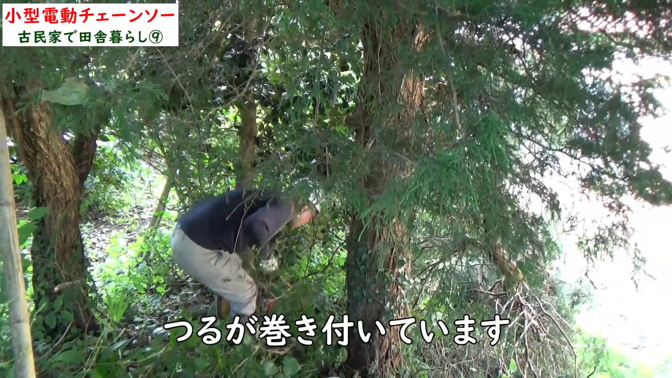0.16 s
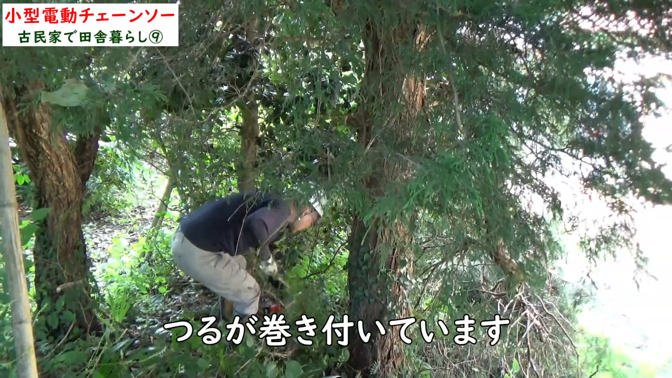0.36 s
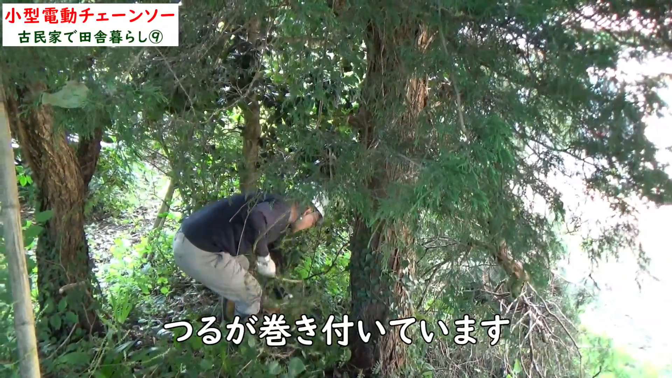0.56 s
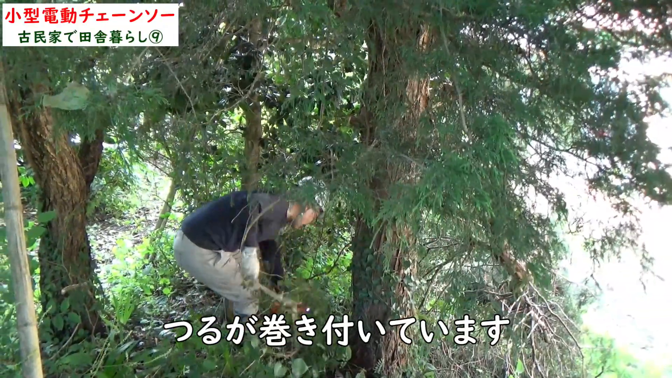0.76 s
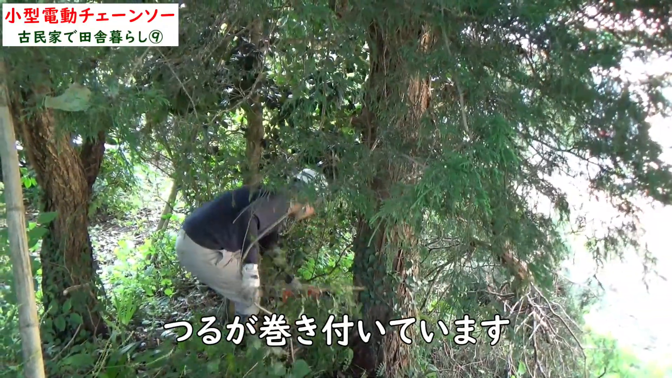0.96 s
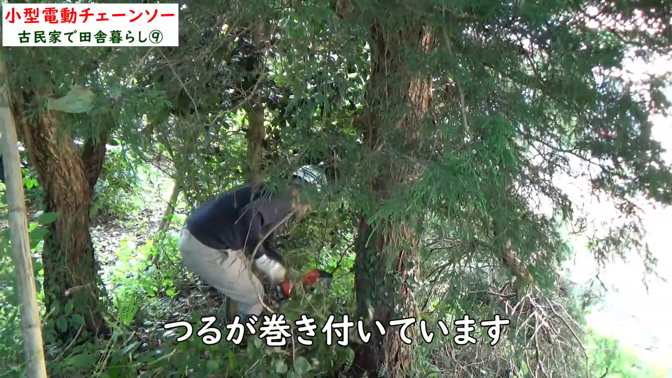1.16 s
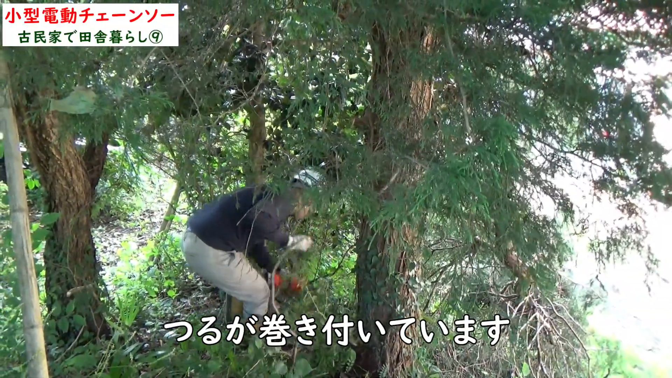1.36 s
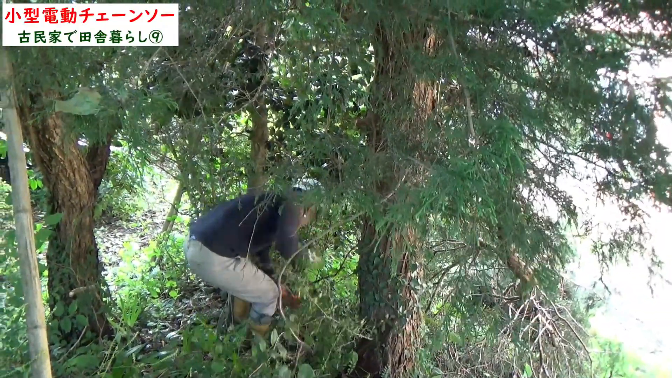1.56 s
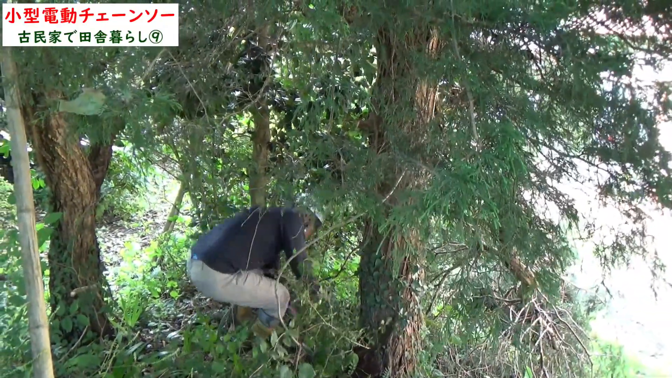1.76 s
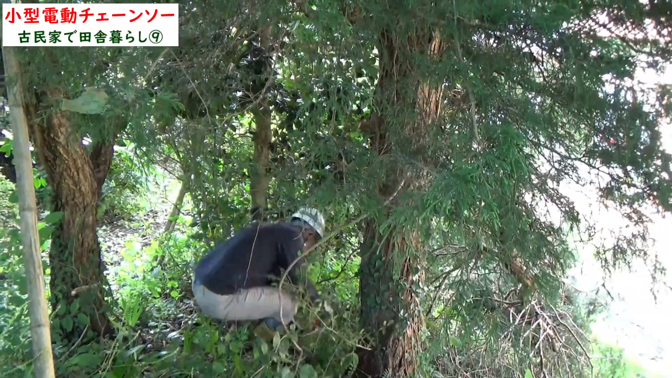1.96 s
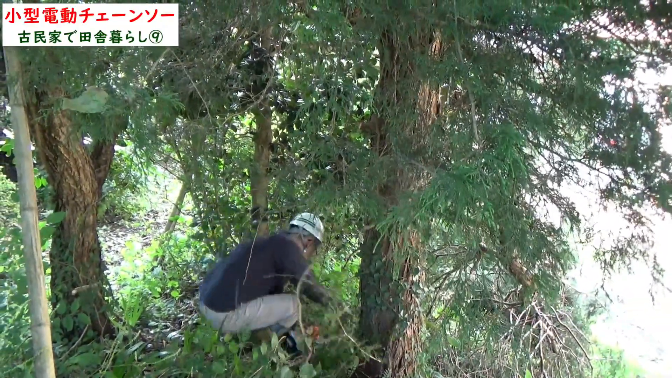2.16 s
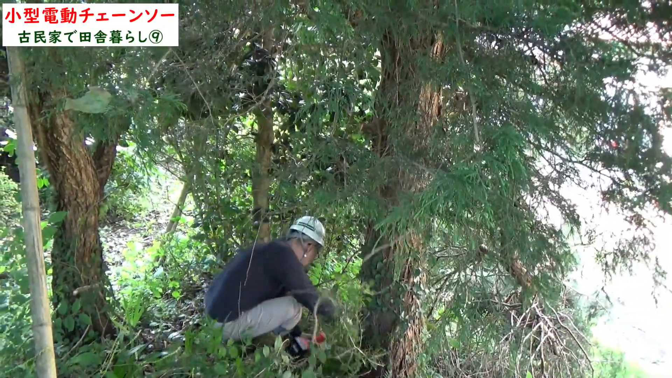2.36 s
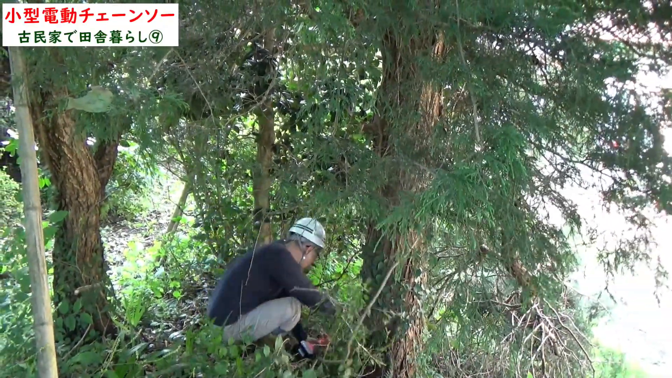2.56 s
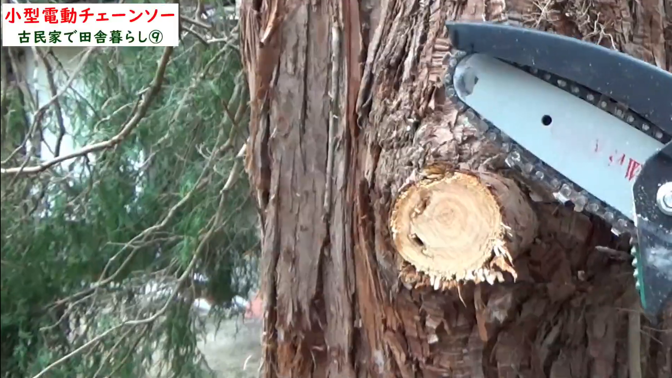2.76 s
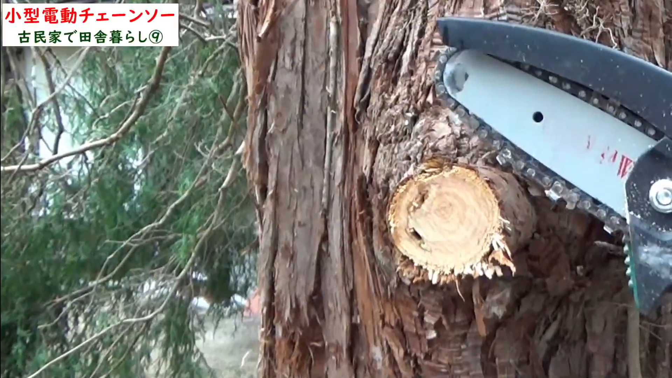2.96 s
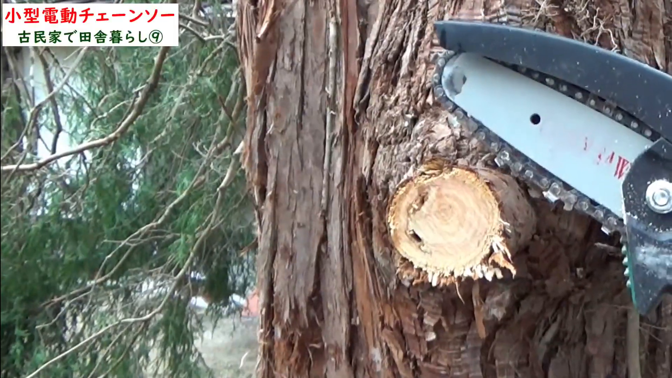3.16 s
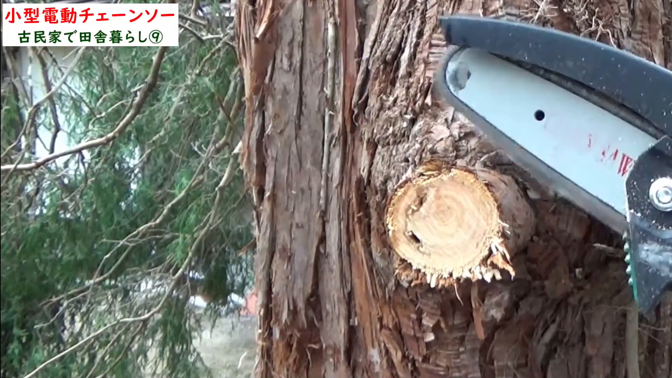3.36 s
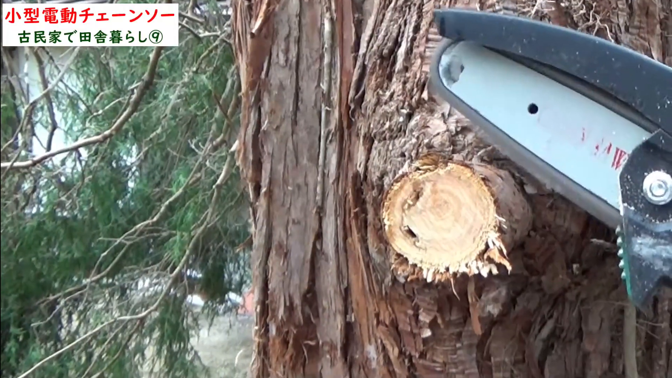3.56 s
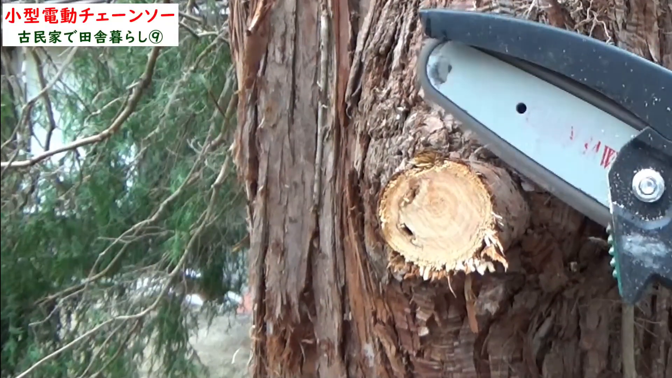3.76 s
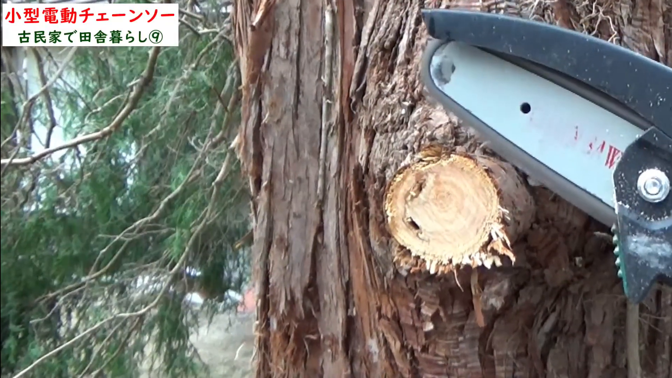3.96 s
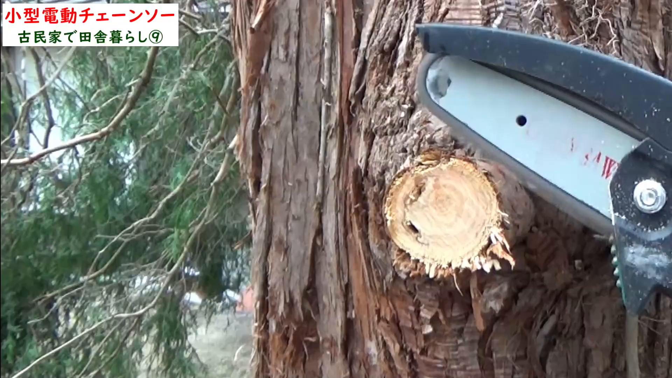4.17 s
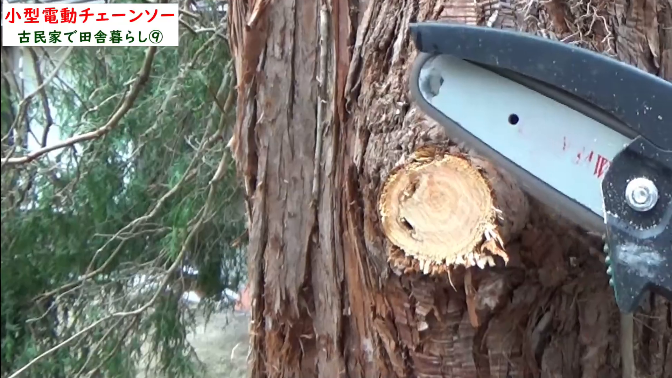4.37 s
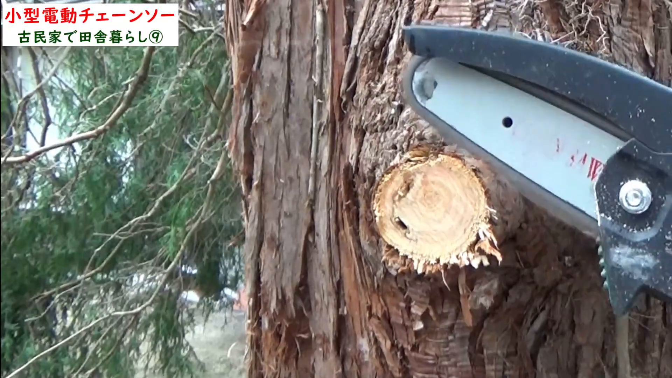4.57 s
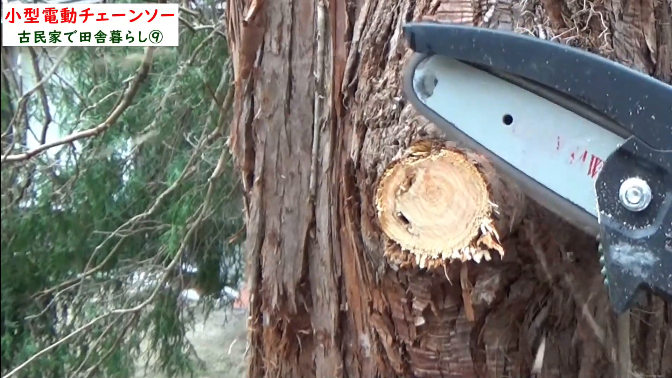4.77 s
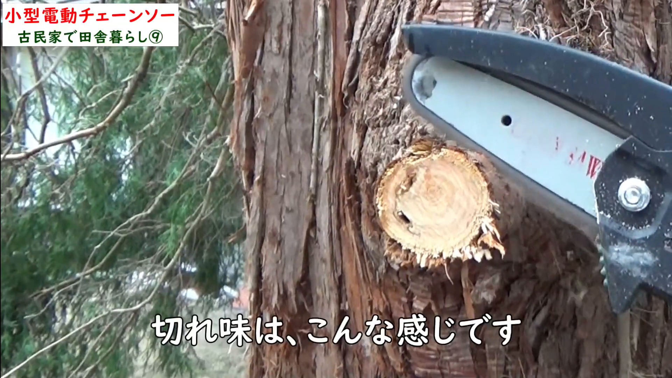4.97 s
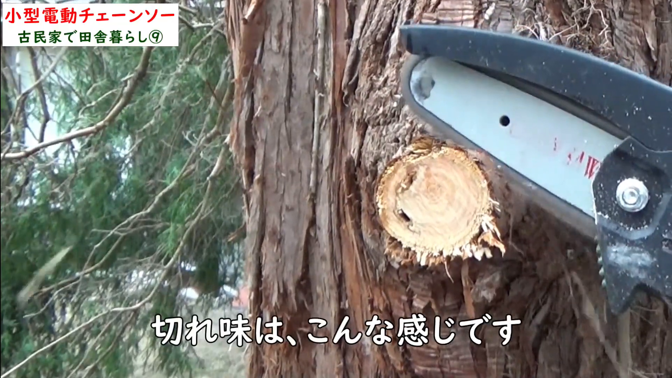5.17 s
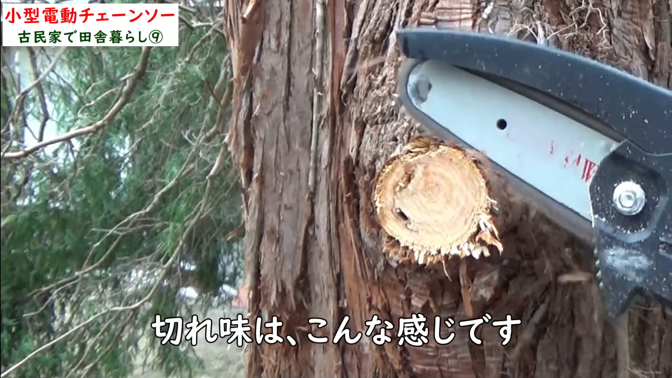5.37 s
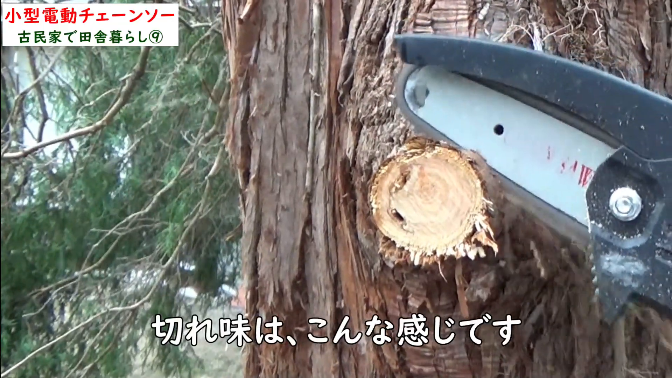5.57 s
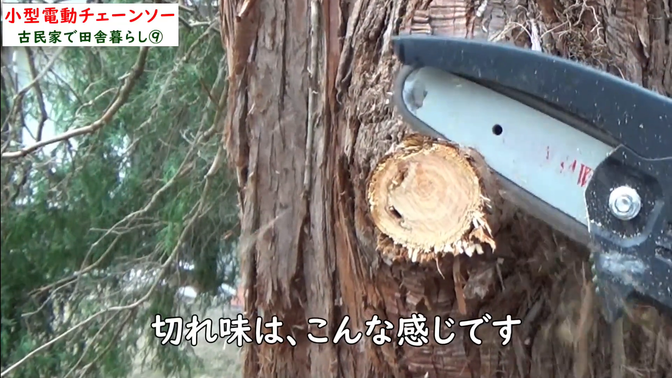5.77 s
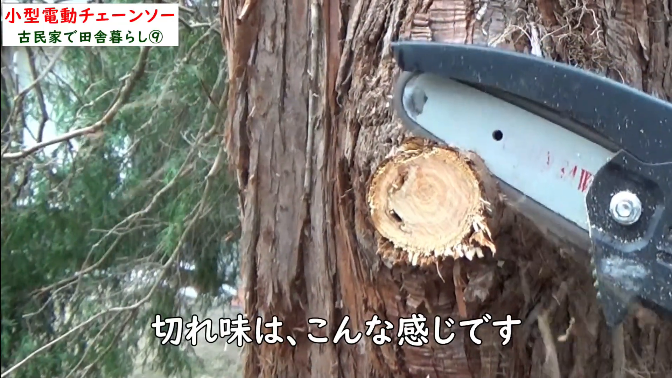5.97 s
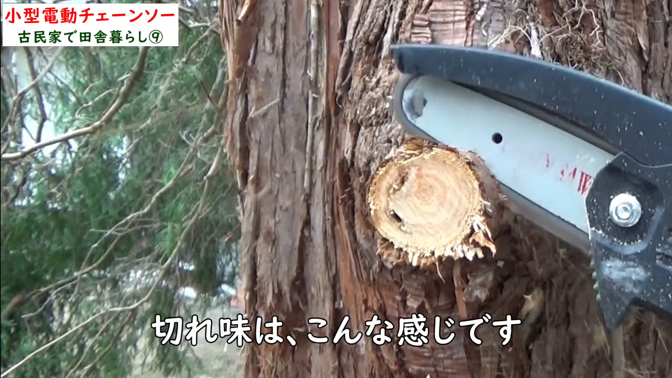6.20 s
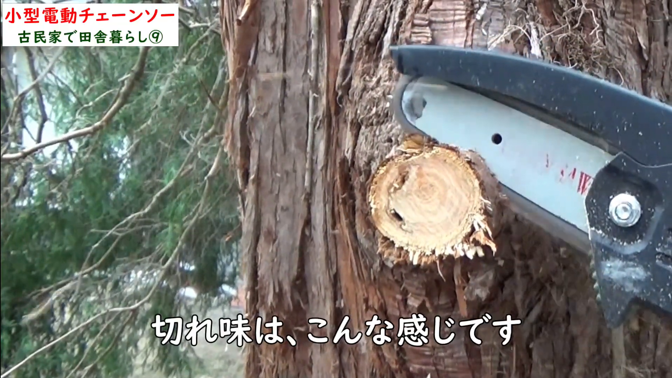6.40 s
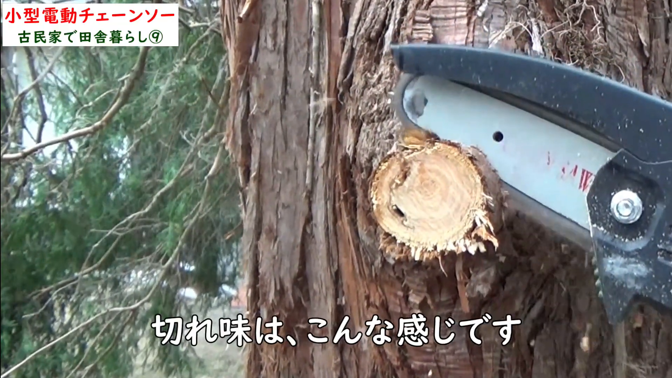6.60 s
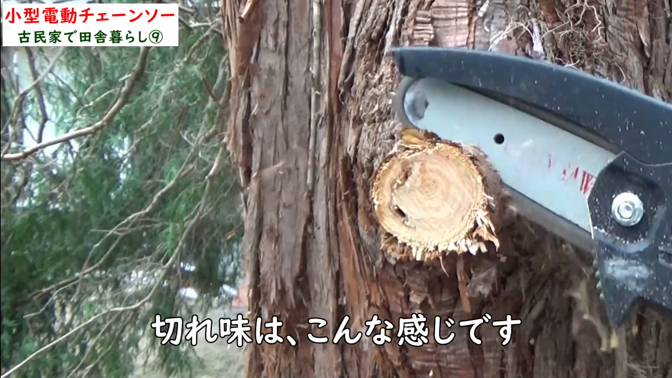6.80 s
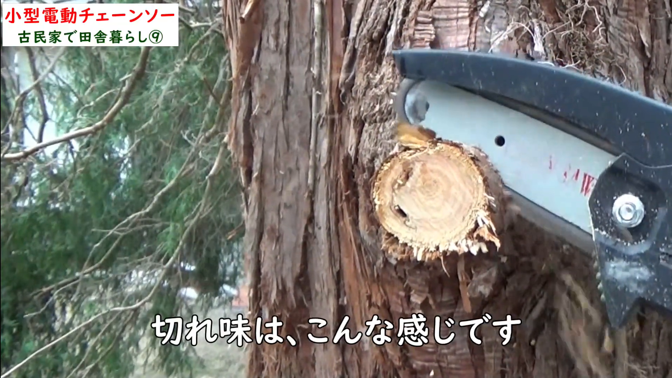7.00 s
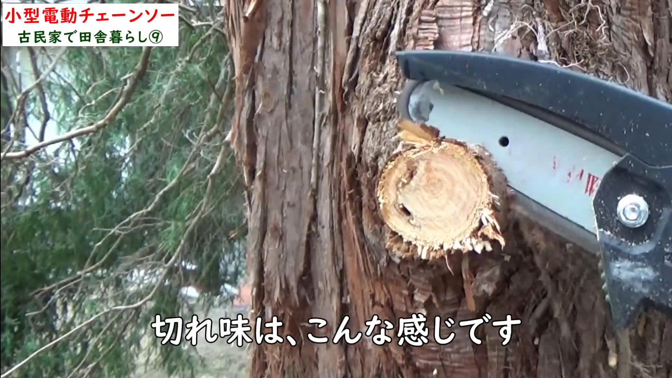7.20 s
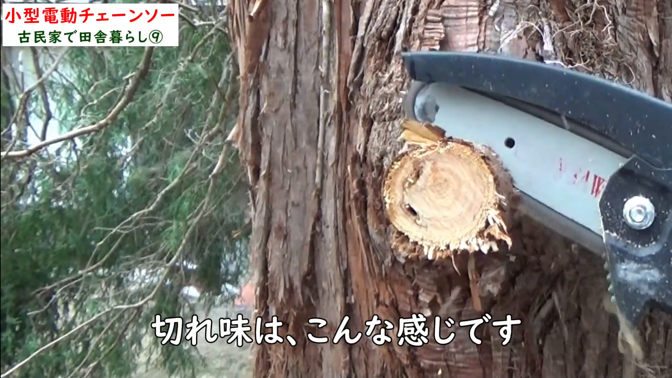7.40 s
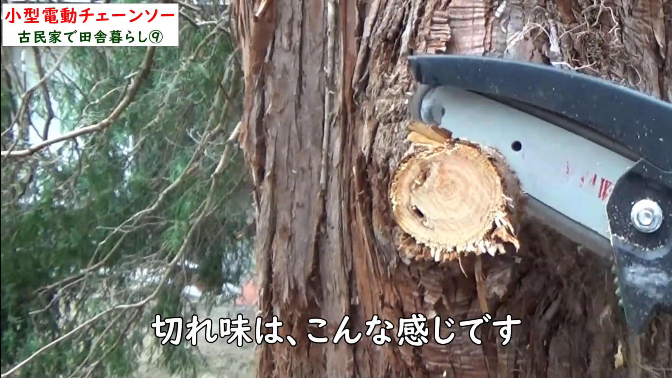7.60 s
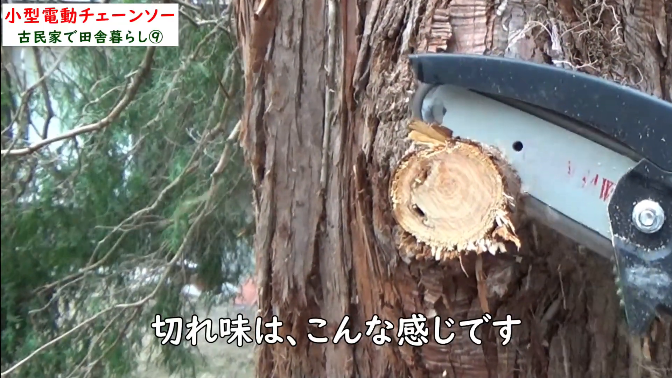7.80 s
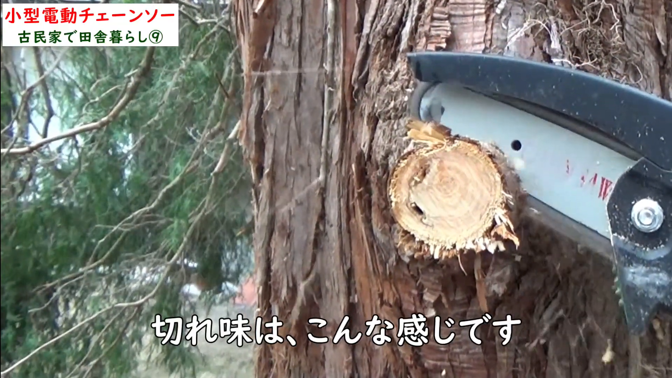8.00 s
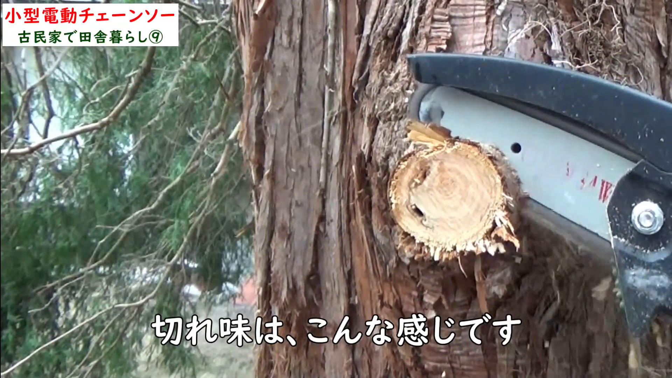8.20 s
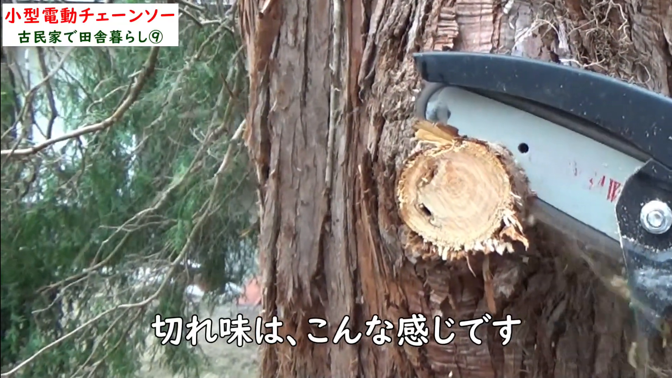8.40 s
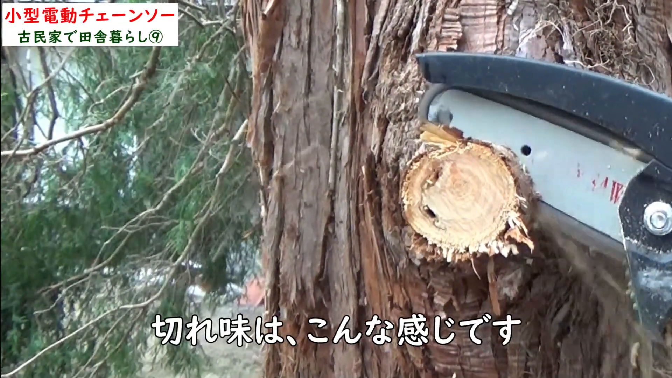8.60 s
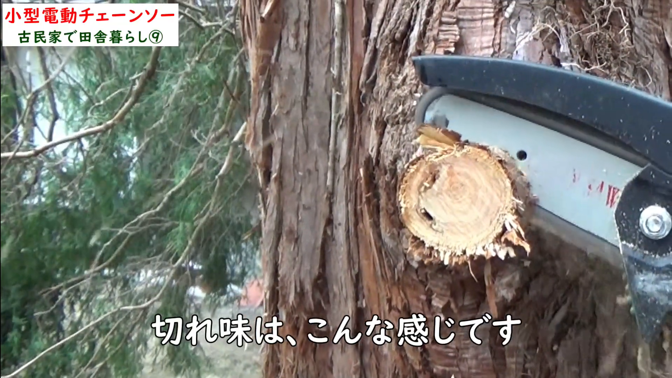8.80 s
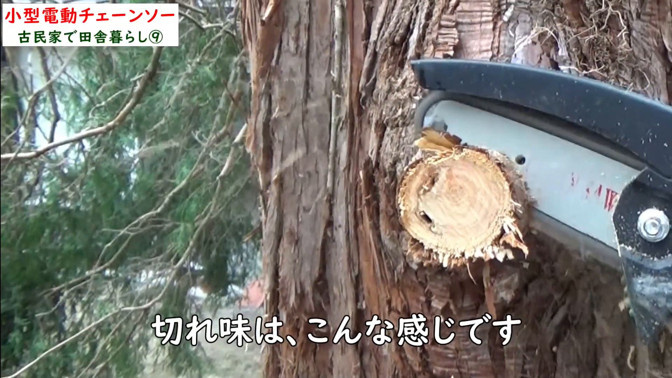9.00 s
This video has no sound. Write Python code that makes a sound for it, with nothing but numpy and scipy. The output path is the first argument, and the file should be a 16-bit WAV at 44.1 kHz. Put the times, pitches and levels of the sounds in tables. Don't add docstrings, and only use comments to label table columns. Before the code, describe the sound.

Overgrown garden, leaf rustle and thin steady insect song. Some metres away a small electric chainsaw buzzes into a squealing vine, then coasts to a stop amid sharp twig snaps, dull knocks and faint whistles. A tiny silence, then close up: clicks, a jolting start, a free-running whine, and a long bright rattling cut into a wooden stub, with teeth snagging. Nearly mono outdoor pickup.

```python
import sys
import numpy as np
from scipy import signal
from scipy.fft import rfft, irfft
from scipy.io import wavfile
from scipy.ndimage import uniform_filter1d, minimum_filter1d

SR = 44100
rng = np.random.default_rng(int(sys.argv[2]) if len(sys.argv) > 2 else 0)


def to_wav(s):
    ch = np.atleast_2d(s).T
    pcm = np.round(np.clip(ch, -1, 1) * 32767)
    wavfile.write(sys.argv[1], SR, pcm.astype(np.int16))


def gain_from_db(level_db):
    decades = np.asarray(level_db, float) / 20
    return 10 ** decades


N = 399105
T = np.arange(N) / SR
CUT_S = 2.638
NEAR_ON_S, NEAR_RISE_S, JOLT_S = 3.408, .0061, 3.43
TOUCH_S, SUNK_S = 4.29, 4.58

# time in seconds, turns per second in Hz.
SHAFT_SPEED = [(3.49, 394), (3.57, 408.5), (4.2, 405.5), (4.55, 391), (5.1, 382), (5.2, 374), (5.65, 373),
               (5.85, 381), (6.3, 376), (7.6, 379), (8.0, 373), (9.05, 372)]


def level(x, db):
    return x * gain_from_db(db) / np.sqrt(np.mean(x ** 2))


def ramp(start, end):
    return np.clip((T - start) / (end - start), 0, 1)


def bump(centre, width):
    return np.exp(-((T - centre) / width) ** 2)


def along(table):
    return np.interp(T, *np.transpose(table))


def tone(hz):
    return np.sin(2 * np.pi * np.cumsum(hz) / SR)


def walk(rate):
    k = int(SR / rate)
    steps = np.repeat(rng.standard_normal(N // k + 1), k)[:N]
    return level(uniform_filter1d(uniform_filter1d(steps, k), k), 0)


def decay(x, t60):
    return signal.lfilter([1], [1, -np.exp(-np.log(1000) / (max(t60, 1e-4) * SR))], x)


def colour(x, points):
    hz, db = np.transpose(points)
    size = 4096
    f = np.maximum(np.arange(size // 2 + 1) * SR / size, 1)
    cepstrum = irfft(np.interp(np.log(f), np.log(hz), db) * np.log(10) / 20)
    cepstrum[1:size // 2] *= 2
    cepstrum[size // 2 + 1:] = 0
    response = irfft(np.exp(rfft(cepstrum)))[:size // 2]
    return signal.oaconvolve(x, response)[:N]


def knocks(per_s, spread_db, t60):
    when = rng.random(N)
    size = np.minimum(rng.exponential(size=N), 4)
    blows = np.clip((per_s / SR - when) * SR / 40, 0, 1) * gain_from_db(spread_db * size)
    swelling = decay(blows, t60)[::-1]
    return level(decay(swelling, 0.71 * t60)[::-1], 0)


def part(envelope, points, wobble_db=.5):
    x = envelope * rng.standard_normal(N) * gain_from_db(wobble_db * walk(12))
    return level(colour(x, points), 0)


def moving_band(envelope, hz, width):
    t60 = np.log(1000) / (np.pi * width)
    noise = rng.standard_normal(N) + 1j * rng.standard_normal(N)
    slow = decay(decay(envelope * noise, t60), t60)
    return level(np.real(slow * np.exp(2j * np.pi * np.cumsum(hz) / SR)), 0)


def insects():
    # pitch in Hz, wander in Hz, level in dB.
    songs = [(3660, 6, -52), (4275, 8, -55), (4370, 10, -54)]
    chorus = sum(gain_from_db(db + walk(20)) * tone(hz + width * walk(30)) for hz, width, db in songs)
    quiet_db = -25
    return chorus * gain_from_db(quiet_db * (1.5 - ramp(1.95, 2.15)))


def garden():
    # frequency in Hz, level in dB per Hz.
    far_colour = [(15, -35), (25, -11), (306, -4), (390, -6.5), (3100, -12), (3550, -7.5), (3850, -8),
                  (4400, -7), (7150, -9), (7960, -1.5), (8870, -4), (13600, -20.5), (15600, -25)]
    # frequency in Hz, level in dB per Hz.
    near_colour = [(25, -26), (60, -15), (140, -4.5), (275, -10), (314, -4), (950, -2.5), (3190, -7),
                   (4520, -10.5), (7960, -8), (11000, -14), (15600, -38)]
    rustle = knocks(360, 2.2, 0.0058) * 0.28 + 1
    far = level(part(rustle, far_colour), -39.5)
    near = level(part(rustle, near_colour), -38)
    near = near * np.where(T > JOLT_S, gain_from_db(-10), 1)
    return np.where(T < CUT_S, far + insects(), near)


def thumps():
    # time in seconds, pitch in Hz, peak in dB.
    knock_table = [(.635, 130, -35.5), (1.15, 175, -42), (3.13, 140, -45), (.5, 187, -33), (3.43, 190, -49),
                   (4.35, 245, -47), (4.5, 246, -45), (5.3, 150, -51)]
    return sum(gain_from_db(db) * bump(s, 0.022) * np.sin(2 * np.pi * hz * T) for s, hz, db in knock_table)


def twigs():
    # time in seconds, peak in dB, ring in Hz, crack in dB against the peak.
    snap_table = [(0.0563, -26, 2110, -12), (0.1334, -17, 8900, -8), (0.1414, -19, 7300, -5),
                  (0.2523, -28, 6480, -12), (0.2574, -24, 10500, -13), (1.6664, -14.5, 8580, -6),
                  (1.9749, -22, 7940, -9), (1.9844, -21.5, 9270, -9), (2.0462, -17, 9370, -10),
                  (2.0894, -30, 4510, -6), (2.4653, -26, 8030, -8), (2.5282, -27, 8280, -6),
                  (2.7344, -39, 1890, -3), (2.8729, -21.5, 2320, -10), (2.8894, -35, 2870, -6),
                  (2.9194, -35, 1910, -6), (3.0969, -20, 5910, -10), (3.1064, -30, 9220, -6),
                  (3.1268, -25, 6200, -7), (3.2044, -31, 5190, -4), (3.2146, -25, 7600, -8),
                  (3.2525, -33, 2260, -6), (3.2685, -31, 1550, 0), (3.3374, -25, 7770, -9)]
    size = 900
    out, t = np.zeros(N + size), np.arange(size) / SR
    for s, db, hz, crack_db in snap_table:
        noise = rng.standard_normal((2, size))
        ring = signal.lfilter(*signal.iirpeak(hz, 3.5, fs=SR), noise[0] * np.exp(-t / .0032))
        crack = uniform_filter1d(np.diff(noise[1], prepend=0), size=4) * np.exp(-t / .0012)
        snap = ring / abs(ring).max() + gain_from_db(crack_db) * crack / abs(crack).max()
        i = int(s * SR)
        out[i:i + size] += gain_from_db(db) * snap
    return out[:N]


def whistles():
    # start in seconds, length in seconds, first pitch in Hz, last pitch in Hz, peak in dB.
    glide_table = [
        (.105, .04, 1900, 3100, -45),
        (2.06, .29, 1330, 990, -46),
        (2.52, .14, 1080, 1290, -54),
        (1.04, .19, 2300, 2090, -37),
        (3.412, .04, 600, 1400, -29),
    ]
    out, flutter = 0, gain_from_db(1.5 * walk(60) - 2)
    for s, length, first_hz, last_hz, db in glide_table:
        way = ramp(s, s + length)
        swell = np.sin(np.pi * way)
        hz = first_hz + (last_hz - first_hz) * way + .05 * first_hz * swell
        out = out + np.sqrt(2) * gain_from_db(db) * swell * flutter * tone(hz)
    return out


def far_levels():
    # time in seconds, pressure in dB.
    pressure_table = [(.274, 1.5), (.405, -3), (.425, 2.5), (.77, 1), (.89, -7.5), (.95, -14),
                      (1.35, -16.5), (1.52, -11), (1.8, -19)]
    # level in dB, drop while spinning up in dB, share of pressure, power of chain speed.
    far_parts = [
        (-14, -10.5, 0.17, 1.43),
        (-23, -11, 0.34, 0.83),
        (-25, -12, 0.97, .7),
        (-41.5, -11, 1.2, .15),
    ]
    on_s, bite_s, let_go_s, rest_s = .25, .2715, .8, 2.12
    pressure = along(pressure_table)
    speed = 1 - ramp(let_go_s, rest_s)
    idle = 1 - ramp(bite_s, bite_s + .002)
    on = ramp(on_s - .001, on_s + .001)
    gains = [on * gain_from_db(db + drop_db * idle + share * pressure) * speed ** power
             for db, drop_db, share, power in far_parts]
    slack = 1 - ramp(bite_s, bite_s + .023)
    gains[0] = gains[0] * gain_from_db(-6 * slack)
    squeal_db = -31 + .6 * pressure - 1.5 * ramp(.56, let_go_s)
    return gains + [(1 - idle) * speed * gain_from_db(squeal_db)]


def vine_squeal(teeth):
    # time in seconds, pitch in Hz.
    pitch_table = [(.28, 3200), (.325, 2950), (.37, 3450), (.47, 2950), (.6, 2800), (.67, 3200),
                   (.72, 2600), (1.1, 2200), (1.65, 2600)]
    # multiple of the squeal pitch, level in dB.
    partners = [(.58, -5), (1, 1), (1.75, -6)]
    pitch, width_hz = along(pitch_table), 380
    return sum(gain_from_db(db) * moving_band(teeth, k * pitch * (1 + .05 * walk(30)), width_hz) for k, db in partners)


def far_saw():
    # frequency in Hz, level in dB per Hz.
    links_colour = [(600, -40), (3000, -23.5), (6700, -10.5), (9300, 0.5), (11000, -4), (13500, -16.5),
                    (15600, -24)]
    # frequency in Hz, level in dB per Hz.
    housing_colour = [(300, -21.5), (1200, -8), (1750, -6), (2050, -4), (2900, -3.5), (4400, -2),
                      (6000, -5.5), (9000, -28)]
    # frequency in Hz, level in dB per Hz.
    vine_colour = [(350, -25.5), (670, -7.5), (800, -16.5), (1040, 4.5), (1200, -1), (1350, -4),
                   (1550, -10), (2500, -20.5)]
    # frequency in Hz, level in dB per Hz.
    trunk_colour = [(60, -41), (110, -10), (190, -1), (250, 0.5), (330, 0), (450, -5), (900, -30)]
    links, housing, vine, trunk, strain = far_levels()
    chain, teeth = knocks(1500, 3.0, .002), knocks(900, 2.5, .004)
    out = strain * vine_squeal(teeth)
    out += links * part(chain + 1.4, links_colour)
    out += gain_from_db(-1.5) * housing * part(chain + 0.22 * teeth + 1.2, housing_colour)
    out += vine * part(teeth + 0.33 * chain, vine_colour, .3)
    out += trunk * part(teeth + 0.55, trunk_colour, 1.5)
    return out


def motor():
    # multiple of the shaft speed, level in dB.
    hum_table = [(1, -1), (2, 0), (3, 7)]
    turn = 2 * np.pi * np.cumsum(along(SHAFT_SPEED) * (1 + .0008 * walk(30))) / SR
    at_speed, load = ramp(3.49, 3.54), ramp(4.17, 4.33)
    whine_gain = at_speed * gain_from_db(-32 - 6 * load)
    hum_gain = at_speed * gain_from_db(-47 - 13 * load)
    whine = whine_gain * gain_from_db(1.2 * walk(40)) * np.sin(12 * turn)
    hum = hum_gain * sum(gain_from_db(db) * np.sin(k * turn) for k, db in hum_table)
    return np.sqrt(2) * (whine + hum)


def near_levels():
    # time in seconds, push in dB.
    push_table = [(3.41, -4.5), (3.45, -1.5), (3.6, -0.5), (4.3, 1), (4.6, -.3), (5.6, 0.05), (7.6, -0.57),
                  (8.4, 0.4), (9.0, 3)]
    # running free in dB, cutting in dB, jolt in dB, share of push.
    near_parts = [
        (-14, -14, 1, 0.67),
        (-21, -20.5, 4.5, 1.04),
        (-37.5, -30.5, 16, 0.97),
    ]
    skip_times = [4.513, 4.563, 4.637, 4.66, 4.881, 4.99, 5.062, 5.156]
    on, contact = ramp(NEAR_ON_S, NEAR_ON_S + NEAR_RISE_S), ramp(TOUCH_S, SUNK_S)
    jolt, push = bump(JOLT_S, .011), along(push_table)
    gains = [on * gain_from_db(free_db + (cut_db - free_db) * contact + jolt_db * jolt + share * push)
             for free_db, cut_db, jolt_db, share in near_parts]
    since = T - 6.34
    kerf_db = np.where(since < 0, -18 + 9 * since, np.maximum(-18 - 2.5 * since, -25))
    gains.append(contact * uniform_filter1d(gain_from_db(kerf_db), size=20000))
    sprocket = np.cumsum(along(SHAFT_SPEED)) / 8 / SR % 1
    skips = sum(bump(s, .005) for s in skip_times)
    unevenness = gain_from_db(-5.5 * skips + .7 * (1 - 2 * sprocket))
    return [unevenness * g for g in gains]


def snagging_teeth():
    # time in seconds, peak in dB.
    catch_table = [(4.327, -11), (4.57, -8), (4.672, -5), (4.752, -8), (4.784, -9), (4.909, -5.5),
                   (5.072, -12), (5.134, -14), (5.228, -14), (5.387, -13), (5.608, -3), (5.642, -6),
                   (5.802, -9), (5.835, -10), (6.116, -6), (6.174, -10), (6.335, -14), (6.872, -14),
                   (6.994, -3), (7.126, -9), (7.158, -5), (7.332, -7), (7.598, -5), (7.674, -6),
                   (8.018, -8), (8.177, -6), (8.228, -18), (8.461, -8), (8.718, -13), (9.023, -12)]
    snags = np.zeros(N)
    for s, db in catch_table:
        snags[int(s * SR)] = gain_from_db(db + 18.0)
    return decay(snags, 0.02)


def near_saw():
    # frequency in Hz, level in dB per Hz.
    links_colour = [(1000, -47), (2900, -13.5), (4500, -13.5), (6400, -11), (8000, -5), (9600, 1),
                    (11000, -7), (13000, -16.5), (15600, -34)]
    # frequency in Hz, level in dB per Hz.
    bar_colour = [(400, -38), (700, -26), (1200, -13), (1600, -5), (1850, -2.5), (2080, 0.5), (2300, -2),
                  (2500, -4.5), (2800, -23), (4000, -31.5)]
    # frequency in Hz, level in dB per Hz.
    wood_colour = [(60, -49), (140, -20), (200, -21.5), (260, -11), (350, -16.5), (460, -3), (600, -6),
                   (1000, 1.5), (1400, -2), (2500, -15)]
    # frequency in Hz, level in dB per Hz.
    kerf_colour = [(3500, -38), (4700, -7), (5400, 2.5), (6000, -5), (7000, -28.5)]
    links, bar, wood, kerf = near_levels()
    chain, teeth = knocks(1500, 3.0, .002), knocks(900, 2.5, .004)
    snags = snagging_teeth()
    undamped = ramp(NEAR_ON_S, NEAR_ON_S + NEAR_RISE_S) * (1 - ramp(TOUCH_S, SUNK_S))
    out = gain_from_db(-27) * undamped * moving_band(teeth + chain, np.full(N, 2300), 600)
    out += gain_from_db(1.4) * links * part(chain + 1.0, links_colour)
    out += gain_from_db(0.7) * bar * part(teeth + 1.1 * chain + .5 + 0.98 * snags, bar_colour, 0.22)
    out += gain_from_db(3.0) * wood * part(teeth + 0.55 + 0.78 * snags, wood_colour, 0.45)
    out += gain_from_db(-0.5) * kerf * part(teeth + 0.72 * chain + 0.2, kerf_colour, 0.32)
    return out


def scattered_side(mid):
    # frequency in Hz, side against middle in dB.
    far_side = [(60, -23), (110, -19), (200, -17), (380, -16), (700, -14), (1290, -25), (2380, -16.5),
                (4400, -14.5), (8120, -19.5), (15000, -30)]
    # frequency in Hz, side against middle in dB.
    near_side = [(60, -28), (200, -24), (380, -18), (700, -24), (1290, -22.5), (2380, -15), (4400, -18),
                 (8120, -16), (11500, -31.5), (15000, -38)]
    scatter = rfft(rng.standard_normal(2048) * np.exp(-np.arange(2048) / SR / .003))
    late = signal.oaconvolve(mid, irfft(scatter / abs(scatter)))[:N]
    band = signal.butter(1, [3500, 11000], "band", fs=SR, output="sos")
    left_lean = .024 * signal.sosfilt(band, mid)
    return np.where(T < CUT_S, colour(late, far_side), colour(late, near_side)) + left_lean


def scene():
    mid = garden() + thumps() + twigs() + whistles() + motor() + far_saw() + near_saw()
    side = scattered_side(mid)
    back_s, fade_s = 2.709, .022
    gate = np.where(T < CUT_S, 1, ramp(back_s, back_s + fade_s))
    return gate * np.array([mid + side, mid - side])


def top_cut(x):
    return signal.sosfilt(signal.butter(12, 15760, fs=SR, output="sos"), x)


def record(dry):
    room = np.minimum(1, .9 / (abs(dry).max(0) + 1e-9))
    gain = uniform_filter1d(minimum_filter1d(room, size=41), size=41)
    low_pass = signal.ellip(10, .2, 70, 15750, fs=SR, output="sos")
    mix = signal.sosfilt(low_pass, dry * gain)
    return top_cut(mix)


dry = scene()
out = record(dry)
to_wav(out)
```